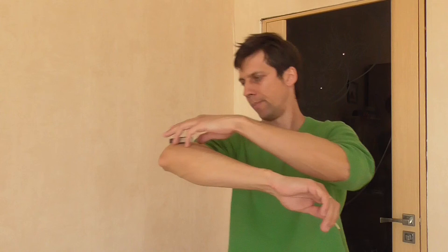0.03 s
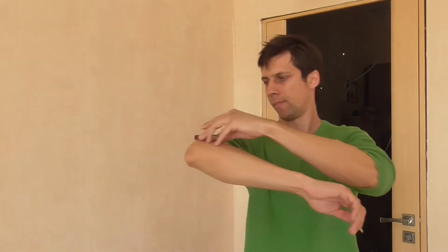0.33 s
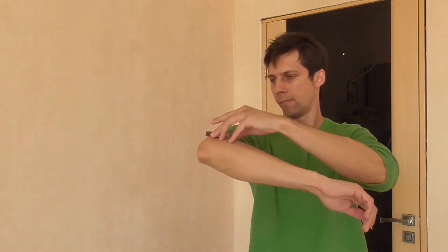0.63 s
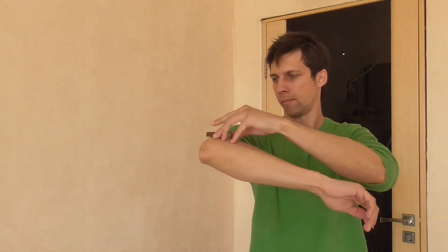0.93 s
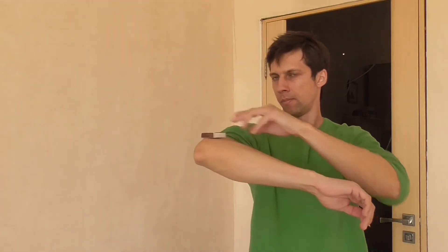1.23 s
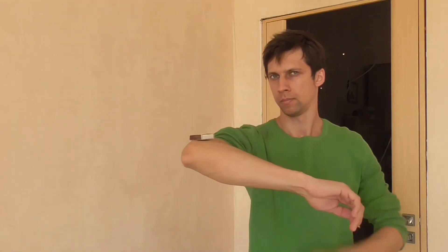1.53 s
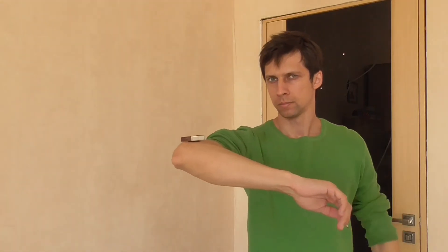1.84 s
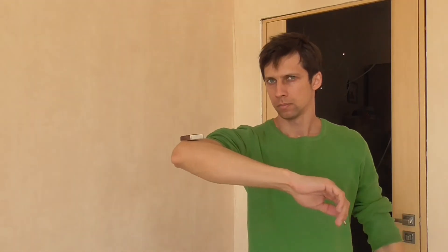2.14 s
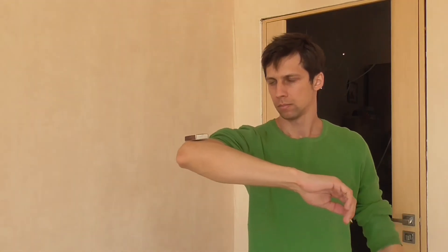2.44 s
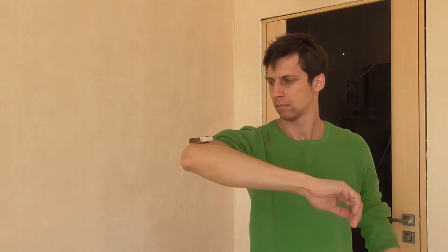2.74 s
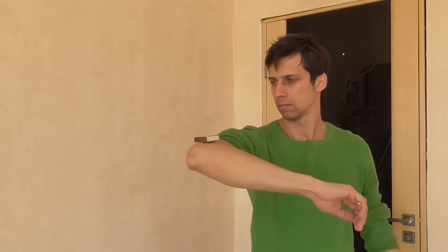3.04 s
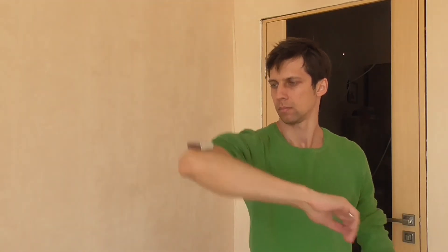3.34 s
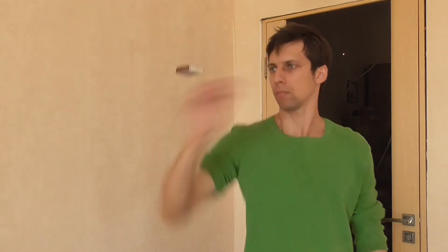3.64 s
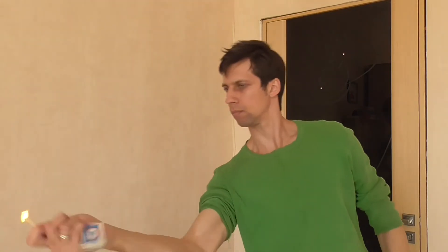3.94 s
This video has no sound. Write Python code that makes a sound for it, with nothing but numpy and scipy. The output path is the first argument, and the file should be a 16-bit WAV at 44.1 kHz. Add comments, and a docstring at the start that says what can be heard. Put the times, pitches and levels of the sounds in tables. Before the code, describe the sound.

A match strikes its box with one sharp scrape, then flares in a quiet room.

```python
"""In a quiet, bare room a matchbox is tossed off an elbow and hit with a match in one fast swing.
A faint hum and hiss lie underneath, and the moving arm and sleeve make soft brushes and thumps.
Near the end the match head cracks and scrapes against the box, setting off short ringing tones.
A moment later the head flares in a few sputtering spurts."""
import sys
import numpy as np
from scipy import signal
from scipy.fft import rfft, irfft
from scipy.io import wavfile
from scipy.ndimage import uniform_filter1d

SR = 44100
rng = np.random.default_rng(int(sys.argv[2]) if len(sys.argv) > 2 else 0)


def log_audio(samples):
    """Write samples as a 16-bit WAV file to the path given in sys.argv[1]."""
    # one column per channel
    frames = np.atleast_2d(samples).T
    # limit to full scale, then quantise
    limited = np.clip(frames, -1, 1)
    pcm = np.round(limited * 32767).astype(np.int16)
    wavfile.write(sys.argv[1], SR, pcm)


N = 176400  # 4 seconds
T = np.arange(N) / SR


def from_db(db):
    """Turn decibels into a number to multiply by."""
    return 10 ** (np.asarray(db) / 20)


def unit_power(x):
    """Scale a signal so that its average power is 1."""
    return x / np.sqrt(np.mean(x ** 2) + 1e-20)


def at_hz(points, hz):
    """Read between the rows of a table that is listed by frequency."""
    freqs, values = np.transpose(points)
    return np.interp(np.log(np.maximum(hz, 1)), np.log(freqs), values)


def colour(x, tone):
    """Shape the lows and highs with a tone table; white noise keeps its power."""
    gain = unit_power(from_db(at_hz(tone, np.fft.rfftfreq(2 * N, 1 / SR))))
    cepstrum = irfft(np.log(gain))
    cepstrum[1:N] *= 2
    cepstrum[N + 1:] = 0  # so the filter never rings before a sound starts
    return irfft(rfft(x, 2 * N) * np.exp(rfft(cepstrum)))[..., :N]


def brighten(x, treble_db, split_hz=5950):
    """Turn the treble up or down."""
    body = signal.sosfiltfilt(signal.butter(2, split_hz, fs=SR, output="sos"), x)
    return body + from_db(treble_db) * (x - body)


def stereo_noise(likeness):
    """White noise for two ears: likeness 1 is the same in both, 0 is unrelated."""
    mid, side = rng.standard_normal((2, N))
    return np.sqrt((1 + likeness) / 2) * mid + np.sqrt((1 - likeness) / 2) * np.array([side, -side])


def envelope(start, rise, hold, decay):
    """Loudness over time: climb, hold, then fall to about a third every `decay` seconds."""
    return np.clip((T - start) / rise, 0, 1) * np.exp(-np.maximum(T - start - rise - hold, 0) / decay)


def crackle(per_s, spread_db):
    """A dense stream of tiny clicks of uneven size, kept at a steady average power."""
    clicks = (rng.random(N) < per_s / SR) * rng.choice([-1, 1], N)
    clicks = clicks * from_db(spread_db * np.minimum(rng.exponential(1, N), 4.1))
    return clicks / np.sqrt(np.maximum(uniform_filter1d(clicks ** 2, 130), 1e-6))


def resonate(x, hz, width_hz):
    """Ring at one pitch; a narrower width rings for longer."""
    r = np.exp(-np.pi * width_hz / SR)
    feedback = [1, -2 * r * np.cos(2 * np.pi * hz / SR), r * r]
    return signal.lfilter(np.array([1, 0, -1]) * (1 - r * r) / 2, feedback, x + 1e-18)


# The notes of the hum and whine. Each row: pitch in Hz, level in dB, filter width in Hz.
HUM_NOTES = [(237.8, -73, 8.6), (599, -70, 7.9), (618.2, -71, 16.7), (750.6, -70, 8.4), (3867, -85, 160),
             (7900, -96, 13), (9050, -86, 2.6)]
# The tone of the room's low rush and of the hiss. Each row: frequency in Hz, boost or cut in dB.
AIR_TONE = [(25, -24.5), (70, -16.5), (110, -8.5), (160, -2.5), (240, 0.5), (330, -1.5), (520, -2),
            (630, -1), (950, -4), (1250, -9.5), (1550, -9), (1750, -18), (2200, -17), (2900, -26.5),
            (3900, -23.5), (6000, -32), (16000, -51)]
HISS_TONE = [(100, 2.5), (3000, -8), (4500, -5.5), (6200, -11), (8300, 0.5), (11000, -2.5), (16000, -6.5)]


def background():
    """Noise narrowed to a few notes hums under the room's soft rush and a thin microphone hiss."""
    hum = 0
    for hz, db, width in HUM_NOTES:
        note = resonate(stereo_noise(likeness=0.38), hz, width)
        hum += from_db(db) * unit_power(resonate(note, hz, width))
    air = from_db(-60.5) * colour(stereo_noise(likeness=0.38), AIR_TONE)
    hiss = from_db(-69) * colour(stereo_noise(likeness=0.1), HISS_TONE)
    # The rush wavers by about 1 dB, heading for a new level about nine times a second.
    waver_db = unit_power(np.interp(T * 9.14, np.arange(200), rng.standard_normal(200)))
    lean_right = from_db([[-0.4], [0.4]])
    return hum + (air * from_db(waver_db) + hiss) * lean_right


# Light brushes. Each row: start in seconds, level in dB, rise and decay in seconds, treble in dB.
BRUSHES = [(.283, -58.5, 0.027, .024, -2.5), (3.455, -73, 0.036, .06, 9)]
# Their papery tone. Each row: frequency in Hz, boost or cut in dB.
BRUSH_TONE = [(500, -12), (1400, 1), (2100, 6), (3000, -4), (4500, -0.5), (7300, 3.5), (11000, -7),
              (16000, -16)]


def sleeve_brushes():
    """Fingers and sleeve rub lightly, making short swells of noise."""
    rub = rng.standard_normal(N)
    brushes = sum(from_db(db) * envelope(start, rise, 0, decay) * brighten(rub, treble_db)
                  for start, db, rise, decay, treble_db in BRUSHES)
    return colour(brushes, BRUSH_TONE)


# Soft thumps. Each row: start in seconds, level in dB, decay in seconds.
ARM_THUMPS = [(0.401, -55, 0.022), (3.353, -54, 0.057), (3.688, -50.5, 0.038), (3.829, -55.5, 0.026)]
# Their dull tone. Each row: frequency in Hz, boost or cut in dB.
THUMP_TONE = [(30, -13.5), (80, -9), (135, 1.5), (220, -4), (400, -1), (800, -8.5), (1500, -26),
              (5000, -37.5)]


def arm_thumps(rise_s=0.0032):
    """The moving arm and sleeve make sudden, low puffs of noise."""
    loudness = sum(from_db(db) * envelope(start, rise_s, 0, decay) for start, db, decay in ARM_THUMPS)
    return colour(loudness * rng.standard_normal(N), THUMP_TONE)


# The match meets the box.
# Each row: start in seconds, level in dB, decay in seconds, crack in dB above that level.
MATCH_HITS = [(3.7116, -20, 0.0033, 13), (3.7154, -24.5, 0.0028, 1), (3.717, -23, 0.0049, 10)]
# The tone of the scrape. Each row: frequency in Hz, boost or cut in dB.
SCRAPE_TONE = [(100, -25), (300, -19.5), (520, -4), (750, -9), (1150, -2.5), (2350, 1.5), (2800, -5.5),
               (3700, 3.5), (5500, -0.5), (9500, 0), (12400, -12), (14500, -21), (16000, -20)]
# Short ringing tones set off by the strike, with two lingering near 2200 Hz.
# Each row: pitch in Hz, strength in dB, seconds to fade by 60 dB.
STRIKE_RING = [(990, 5, 0.037), (1350, -7, .1), (2160, 1, 0.22), (2300, -4, .2), (2480, 3, 0.049),
               (3583, -1, 0.032), (4400, -13, 0.048), (4800, -2, 0.024), (6600, -10, .012)]


def match_strike(rise_s=0.00038):
    """The head catches three times on the gritty strip; each crack and scrape leaves a short ring."""
    force = sum(from_db(db) * envelope(start, rise_s, 0, decay) for start, db, decay, _ in MATCH_HITS)
    grit = force * crackle(per_s=14000, spread_db=4)
    for start, db, _, crack_db in MATCH_HITS:
        grit[int(start * SR)] += from_db(db + crack_db)
    scrape = colour(grit, SCRAPE_TONE)
    ring = sum(from_db(db) * resonate(scrape, hz, width_hz=np.log(1000) / (np.pi * fade_s))
               for hz, db, fade_s in STRIKE_RING)
    return scrape + ring


# Spurts of flame.
# Each row: start in seconds, level in dB, rise, hold and decay in seconds, treble in dB.
FLAME_SPURTS = [(3.9023, -28.5, 0.0034, 0.0065, 0.0047, -2.5), (3.9182, -33, .001, .001, .003, -3),
                (3.9230, -23, 0.0021, 0.0018, .002, 5), (3.929, -27.5, 0.0012, 0.0056, 0.0068, 0),
                (3.945, -38.5, .004, 0.011, .012, -16), (3.951, -34.5, 0.0025, 0.016, 0.0069, -22),
                (3.964, -30, .001, .002, .005, -13)]
# The tone of the flame. Each row: frequency in Hz, boost or cut in dB.
FLAME_TONE = [(100, -28), (300, -14), (650, -7.5), (1300, -3.5), (2100, 1), (2750, -4), (3400, 2),
              (4300, 3), (5400, -1.5), (7600, 2.5), (9400, 0.5), (10800, -6.5), (13400, -11), (16000, -26)]


def match_flare():
    """The head burns in spurts of fine crackle, brightest at the fiercest moment."""
    sparks = crackle(per_s=14000, spread_db=2.5)
    spurts = sum(from_db(db) * envelope(start, rise, hold, decay) * brighten(sparks, treble_db)
                 for start, db, rise, hold, decay, treble_db in FLAME_SPURTS)
    return colour(spurts, FLAME_TONE)


# Which side is louder. Each row: frequency in Hz, left level minus right level in dB.
LEFT_OVER_RIGHT = [(200, -2.5), (900, 2), (3000, 1), (7000, -.7), (10500, -.5), (13000, -14), (16000, -1)]


def direct_sound(x, right_lag_s=0.000014):
    """Sound that comes straight over reaches the right side a little later, with more top treble."""
    hz = np.fft.rfftfreq(2 * N, 1 / SR)
    lean = from_db(at_hz(LEFT_OVER_RIGHT, hz) / 2)
    delay = np.exp(-2j * np.pi * hz * right_lag_s)
    return irfft(rfft(x, 2 * N) * np.array([lean, delay / lean]))[:, :N]


# How long the echo lasts. Each row: frequency in Hz, seconds to fade by 60 dB.
ECHO_FADE = [(150, 0.8), (600, 0.34), (1400, .5), (3700, 0.37), (9000, 0.34), (15000, 0.43)]
# The tone of the echo. Each row: frequency in Hz, boost or cut in dB.
ECHO_TONE = [(150, 1), (600, 3), (2200, -0.5), (4000, -1.5), (6000, -5.5), (9500, -3.5), (15000, 1.5)]
# How alike the echo is in both ears. Each row: frequency in Hz, likeness (1 means the same).
ECHO_LIKENESS = [(150, .55), (1000, 0.66), (2500, 0.67), (4500, 0.4), (8000, -0.052), (15000, -.1)]


def room_echo(x, gain_db=-3, gap_s=0.0032, build_s=0.004):
    """Bare walls throw back a blur of echoes; each frequency band dies away at its own rate."""
    edges_hz = np.geomspace(60, 17000, 15)
    echo = 0
    for low, high in zip(edges_hz, edges_hz[1:]):
        hz = np.sqrt(low * high)
        noise = stereo_noise(at_hz(ECHO_LIKENESS, hz))[:, :SR]
        band = signal.sosfilt(signal.butter(2, [low, high], "band", fs=SR, output="sos"), noise)
        fall = envelope(gap_s, build_s, 0, at_hz(ECHO_FADE, hz) / np.log(1000))[:SR]
        echo += band * fall / np.linalg.norm(fall) * from_db(at_hz(ECHO_TONE, hz))
    return from_db(gain_db) * signal.fftconvolve(x[None], echo, axes=1)[:, :N]


def scene():
    """Sleeve, arm and match are heard directly and off the walls, over the background."""
    sounds = sleeve_brushes() + arm_thumps() + match_strike() + match_flare()
    return background() + direct_sound(sounds) + room_echo(sounds)


def record(dry):
    """Fade in quickly after a moment of silence and cut off the very highest treble."""
    start_s, fade_s, cutoff_hz = 0.072, 0.018, 15900
    faded_in = dry * np.clip((T - start_s) / fade_s, 0, 1)
    treble_cut = signal.firwin(301, cutoff_hz, fs=SR)
    return signal.fftconvolve(faded_in, treble_cut[None], mode="same", axes=1)


dry = scene()
out = record(dry)
log_audio(out)
```